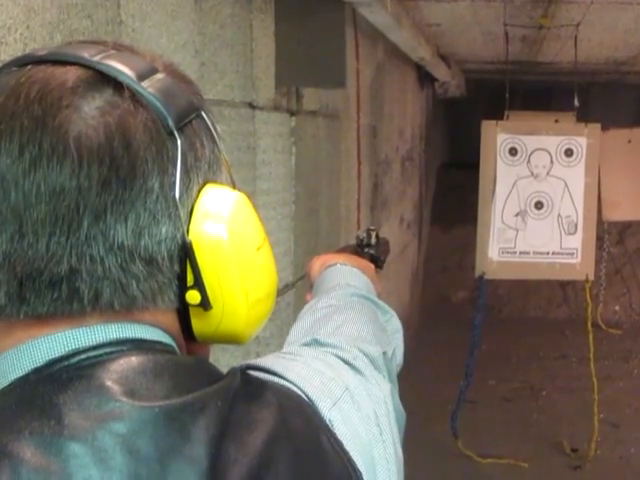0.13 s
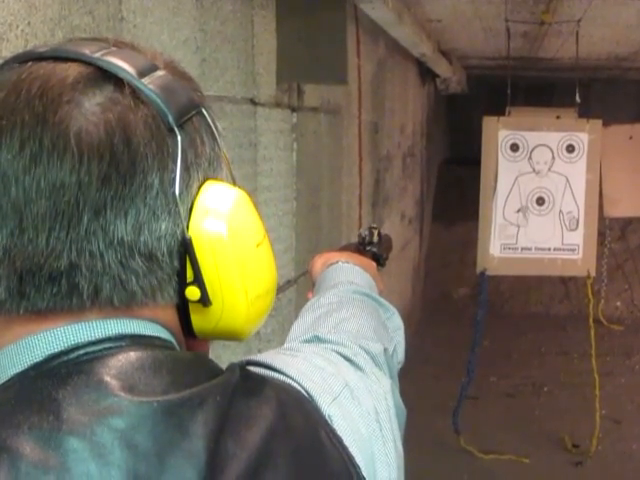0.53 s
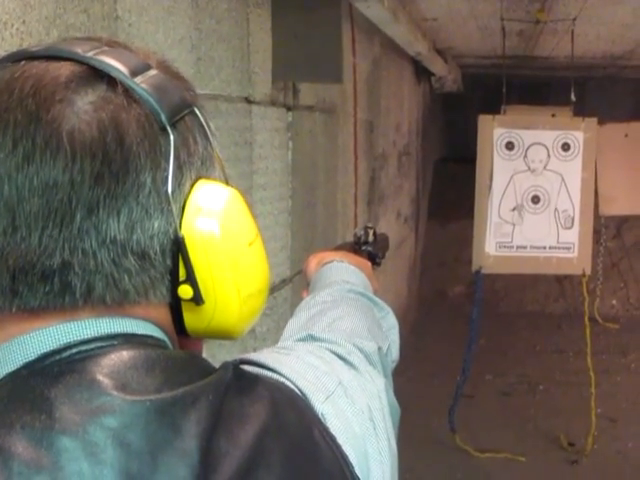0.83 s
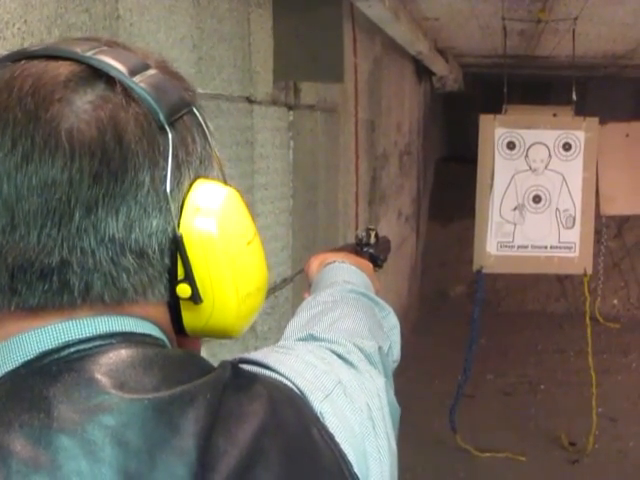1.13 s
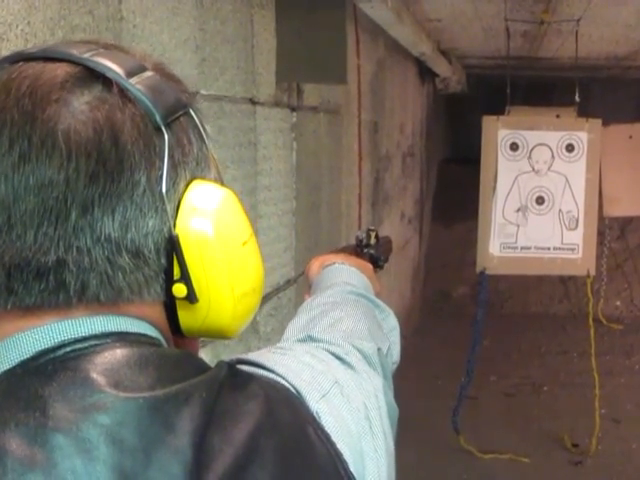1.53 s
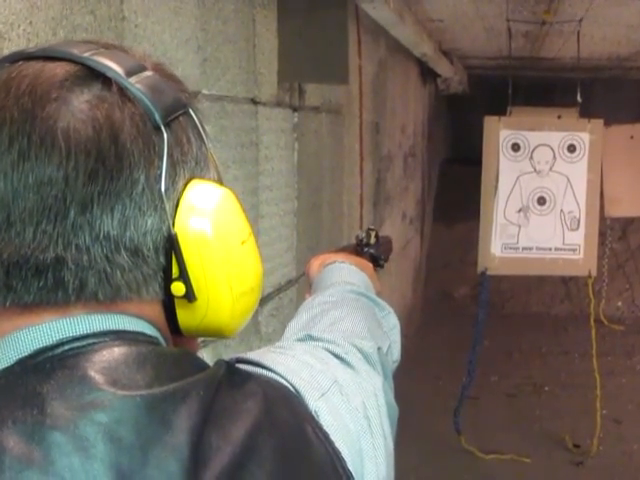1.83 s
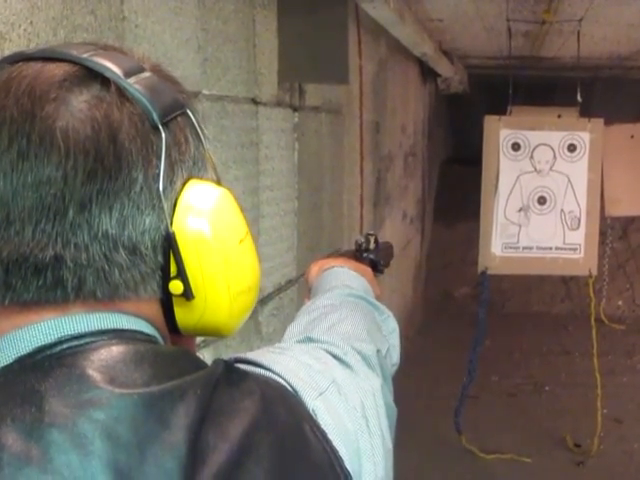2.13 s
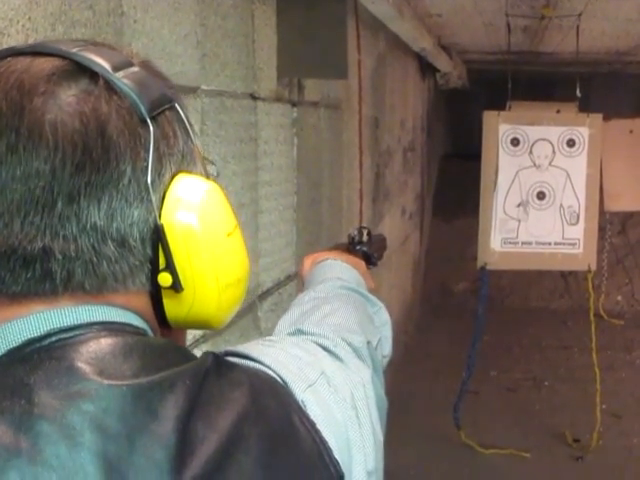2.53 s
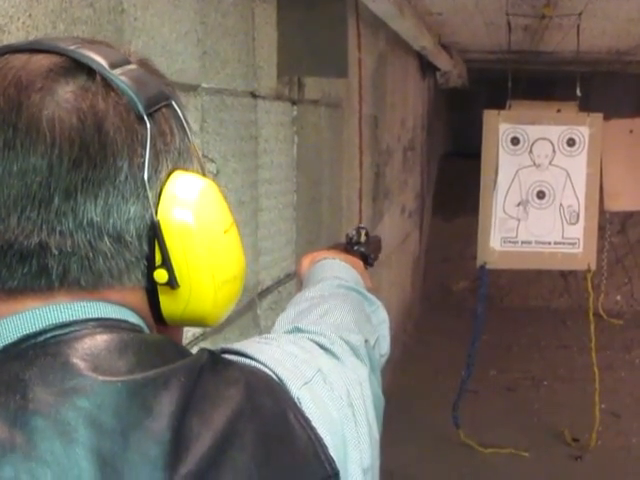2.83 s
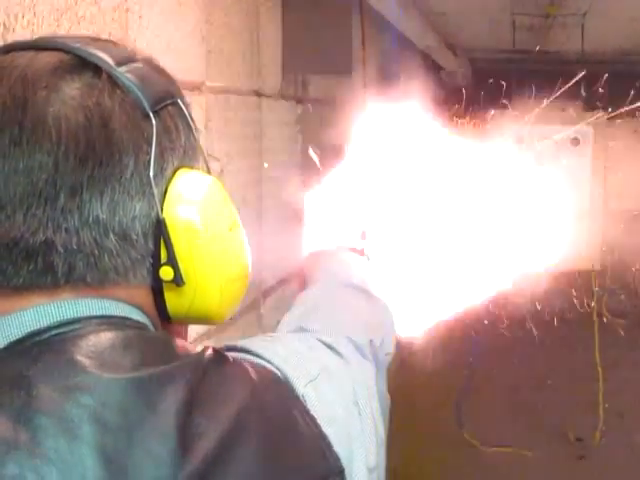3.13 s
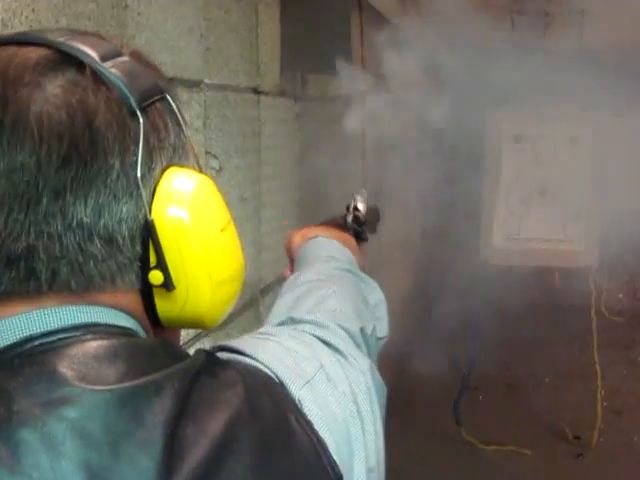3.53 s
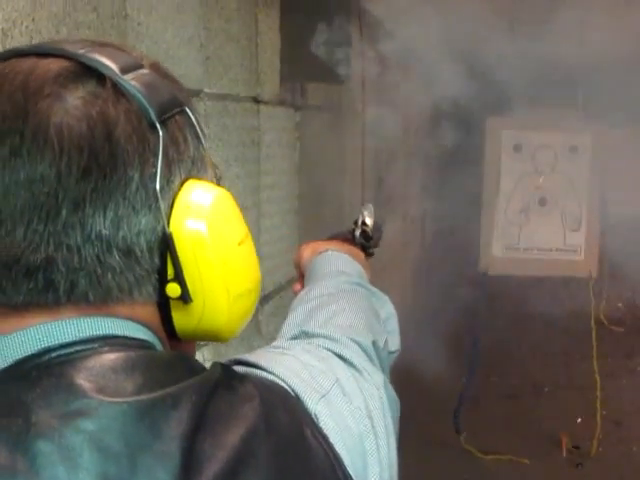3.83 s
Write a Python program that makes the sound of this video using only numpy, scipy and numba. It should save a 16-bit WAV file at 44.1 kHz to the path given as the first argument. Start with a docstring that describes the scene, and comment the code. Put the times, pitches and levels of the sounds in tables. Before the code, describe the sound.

Single flintlock pistol shot indoors: quick lock clack, loud blast, deep slowly fading boom

```python
"""Flintlock pistol in an indoor range

A flintlock fires in a concrete range, close to a camera, over steady ventilation. Flint strikes and scrapes
steel (rings and noise), priming fizzes and the vent spits (noise), then the charge goes off (shock pulse,
booth resonances, noise). Fading noise and wavering tones make the range's long low boom.
The gain control ducks under the blast and holds the boom almost level while its treble dies.
"""
import sys
import numpy as np
from scipy import signal
from scipy.fft import rfft, irfft, next_fast_len
from scipy.io import wavfile
from scipy.ndimage import map_coordinates
from numba import njit

SR = 44100
rng = np.random.default_rng(int(sys.argv[2]) if len(sys.argv) > 2 else 0)


def inscribe(sig):
    """Save sig as 16-bit PCM at rate SR to the path in sys.argv[1].

    A 1-D sig is mono; a 2-D sig holds one channel per row.
    Samples are clipped to [-1, 1] before scaling.
    """
    pcm = np.round(np.clip(np.atleast_2d(sig).T, -1, 1) * 32767)
    wavfile.write(sys.argv[1], SR, pcm.astype(np.int16))


N = 176400
T = np.arange(N) / SR
SHOT_S = 3.1992
STRIKE_S = 3.046


def amp(db):
    """Decibels to gain."""
    return 10 ** (np.asarray(db) / 20)


def unit(x):
    """Scale to rms 1."""
    return x / np.sqrt(np.mean(x ** 2) + 1e-20)


def along(points, hz):
    """Interpolate (Hz, value) points on a log frequency axis."""
    point_hz, value = np.transpose(points)
    return np.interp(np.log(hz + 1), np.log(point_hz + 1), value)


def filtered(x, response):
    """Multiply the spectrum of x by a gain function of Hz, with reflected edges."""
    edge = SR // 4
    size = next_fast_len(N + 2 * edge)
    padded = np.pad(x, (edge, size - N - edge), "reflect")
    spectrum = rfft(padded) * response(np.fft.rfftfreq(size, 1 / SR))
    return irfft(spectrum, size)[edge:edge + N]


def noise(spectrum):
    """Noise of rms 1 coloured by (Hz, dB) points."""
    return unit(filtered(rng.standard_normal(N), lambda hz: amp(along(spectrum, hz))))


def band(centre_hz, half_width_hz):
    """Noise of rms 1 in one resonance, at half amplitude half_width_hz off centre."""
    return unit(filtered(rng.standard_normal(N), lambda hz: 1 / (1 + ((hz - centre_hz) / half_width_hz) ** 2)))


def wobble(knots_per_s):
    """Smooth random curve through unit-variance knots."""
    return map_coordinates(rng.standard_normal(256), [T * knots_per_s], mode="wrap")


def envelope(start_s, rise_s, hold_s, t60_s):
    """Straight rise, hold, exponential fall."""
    t = T - start_s
    fall_db = -60 * np.maximum(t - rise_s - hold_s, 0) / t60_s
    return np.clip(t / rise_s, 0, 1) * amp(fall_db)


# Resonances of the shooting booth. Each row: frequency in Hz, level in dB, T60 in seconds.
BOOTH_MODES = [(82.3, 2.5, .3), (200, 6, 0.16), (260, 7, .15), (329.6, 6, 0.12), (519.4, 10, 0.091),
               (780, 19, .02), (870, 10, 0.077), (1046, 7, .07), (1452, 2.5, 0.11), (1819, 1, 0.12),
               (1944, -1, .1), (2483, 3, .09)]
# Blast noise spectrum. Each row: frequency in Hz, relative level in dB.
BLAST_SPECTRUM = [(29, -34), (60, -3), (200, -3.5), (400, 2.5), (600, -0.5), (900, 0), (1250, -6),
                  (1900, -3.5), (2600, -7.5), (5000, -17), (7000, -24), (11000, -19), (14000, -60)]
SHOCK_S, SHOCK_DB = 0.00046, 6
BLAST_DB, BLAST_RISE_S, BLAST_T60_S = 10, .003, 0.099
RING_HZ, RING_DB, RING_RISE_S, RING_T60_S = 3670, -27.5, .002, 1.3


def blast():
    """The muzzle's shock wave rings the booth, scatters from its walls and leaves a thin ring of steel."""
    t = np.maximum(T - SHOT_S, 0)
    shock = (T >= SHOT_S) * (1 - t / SHOCK_S) * np.exp(-t / SHOCK_S)
    booth = np.zeros(N)
    for k, (hz, db, t60_s) in enumerate(BOOTH_MODES):
        polarity = (-1) ** k
        booth += polarity * amp(db - 60 * t / t60_s) * np.sin(2 * np.pi * hz * t)
    scatter = noise(BLAST_SPECTRUM) * envelope(SHOT_S, BLAST_RISE_S, 0, BLAST_T60_S)
    ring = np.sin(2 * np.pi * RING_HZ * t) * envelope(SHOT_S, RING_RISE_S, 0, RING_T60_S)
    return amp(SHOCK_DB) * shock + booth + amp(BLAST_DB) * scatter + amp(RING_DB) * ring


# Reverberation spectrum before its fade. Each row: frequency in Hz, relative level in dB.
BOOM_SPECTRUM = [(12, -33), (20, -13), (85, -0.5), (165, -11.5), (210, -10.5), (395, -15), (439, -15),
                 (514, -18.5), (969, -22.5), (1200, -30.5), (1480, -25), (4140, -39.5), (5390, -44),
                 (6320, -58.5), (11000, -54), (14300, -91.5), (22000, -120)]
# Reverberation time of the range. Each row: frequency in Hz, T60 in seconds.
BOOM_T60_S = [(60, 9.9), (200, 2.8), (500, 1.94), (1200, 1.81), (2500, 1.61), (5000, 1.07), (9000, .7)]
BOOM_DB, BOOM_RISE_S, BOOM_ROUGH_DB = -3, 0.09, 0.53


def reverberation():
    """Dense reflections fill the range; each frequency then fades at its own rate."""
    hz, t, bins = signal.stft(noise(BOOM_SPECTRUM), SR, nperseg=1024)
    fade = amp(-60 * np.maximum(t - SHOT_S - BOOM_RISE_S, 0) / along(BOOM_T60_S, hz)[:, None])
    wash = signal.istft(bins * fade, SR, nperseg=1024)[1][:N]
    rise = np.sqrt(np.clip((T - SHOT_S) / BOOM_RISE_S, 0, 1))
    return amp(BOOM_DB + BOOM_ROUGH_DB * wobble(45)) * wash * rise


# Standing waves of the range. Each row: frequency in Hz, level in dB.
ROOM_MODES = [(30.5, -5.5), (56, -5), (73.9, -1.5), (83, -7), (118, -15.5), (152.8, -11), (224, -15),
              (336, -21.5), (435.5, -25)]
MODE_RISE_S, MODE_T60_S, MODE_DRIFT_RAD, MODE_ROUGH_DB = 0.19, 4.45, 0.72, 1.35


def standing_waves():
    """Low room modes build up and decay, each wavering in level and phase."""
    waves = np.zeros(N)
    for hz, db in ROOM_MODES:
        phase = 2 * np.pi * (hz * T + rng.random()) + MODE_DRIFT_RAD * wobble(8)
        waves += amp(db + MODE_ROUGH_DB * wobble(14)) * np.sin(phase)
    return waves * envelope(SHOT_S, MODE_RISE_S, 0, MODE_T60_S)


# Dull first return. Each row: frequency in Hz, relative level in dB.
THUD_SPECTRUM = [(30, -16), (60, 1), (120, 2), (200, -21), (500, -12), (1200, -27), (4000, -48.5),
                 (11000, -70)]
THUD_S, THUD_DB, THUD_RISE_S, THUD_T60_S = 3.286, -4.5, 0.014, .25
# Echo from the far end. Each row: frequency in Hz, relative level in dB.
ECHO_SPECTRUM = [(200, -9), (700, -3.5), (1800, 1), (4000, -15), (9000, -44)]
ECHO_S, ECHO_DB, ECHO_RISE_S, ECHO_HOLD_S, ECHO_T60_S = 3.365, -9, 0.032, 0.014, .12


def returns():
    """A dull thud returns from the range, then a brighter echo from the far end."""
    thud = amp(THUD_DB) * noise(THUD_SPECTRUM) * envelope(THUD_S, THUD_RISE_S, 0, THUD_T60_S)
    echo = amp(ECHO_DB) * noise(ECHO_SPECTRUM) * envelope(ECHO_S, ECHO_RISE_S, ECHO_HOLD_S, ECHO_T60_S)
    return thud + echo


# Priming powder fizz. Each row: frequency in Hz, relative level in dB.
FIZZ_SPECTRUM = [(290, -40.5), (500, -4), (895, -15.5), (1430, -4), (5260, -9), (6310, -27.5),
                 (7090, -15.5), (11000, -14.5), (14300, -44), (22000, -120)]
FIZZ_DB, FIZZ_RISE_S, FIZZ_T60_S = -40, .02, 1
# Vent jet. Each row: frequency in Hz, relative level in dB.
VENT_SPECTRUM = [(150, -32), (300, -5.5), (1200, -1.5), (2000, -5), (2700, 4.5), (3300, -11), (4000, -0.5),
                 (5400, -3), (7000, -17.5), (10500, 0), (14000, -54)]
VENT_PEAK_S, VENT_DB, VENT_SWELL_T60_S, VENT_FALL_T60_S = 3.195, -9, .022, 0.17


def priming():
    """Powder fizzes in the pan, then a jet swells out of the vent and dies exponentially."""
    fizz = amp(FIZZ_DB) * noise(FIZZ_SPECTRUM) * envelope(STRIKE_S, FIZZ_RISE_S, 0, FIZZ_T60_S)
    t = T - VENT_PEAK_S
    drop_db = 60 * np.maximum(t / VENT_FALL_T60_S, -t / VENT_SWELL_T60_S)
    jet = amp(VENT_DB - drop_db) * noise(VENT_SPECTRUM)
    return fizz + jet


# Blows in the lock. Each row: start in seconds, level in dB, noise centre in Hz.
BLOWS = [(3.0463, -17, 3800), (3.053, -19.5, 2720), (3.0555, -25, 1700), (3.069, -31.5, 1770)]
BLOW_RISE_S, BLOW_T60_S, BLOW_HALF_WIDTH_HZ = .0005, 0.03, 560
# Steel resonances. Each row: frequency in Hz, relative level in dB, T60 in seconds.
STEEL_MODES = [(1653, -4, .14), (2640, -17.5, .2), (3480, -7, .2), (5660, -6, .06), (8210, -9, .23),
               (10240, -6, .19)]
STEEL_RE_BLOW_DB, STEEL_RISE_S = -18.5, 0.0007
# Flint scrape. Each row: frequency in Hz, relative level in dB.
SCRAPE_SPECTRUM = [(180, -70), (300, -47), (591, -17), (1270, -23), (1650, -5), (2470, -21), (2750, -12.5),
                   (5180, -11.5), (6490, -22.5), (11000, -14.5), (14300, -55), (22000, -120)]
SCRAPE_DB, SCRAPE_RISE_S, SCRAPE_HOLD_S, SCRAPE_T60_S = -24.5, 0.0076, 0.0051, 0.11


def lock():
    """The cock's blows ring the steel while the flint scrapes down it."""
    scrape_envelope = envelope(STRIKE_S, SCRAPE_RISE_S, SCRAPE_HOLD_S, SCRAPE_T60_S)
    out = amp(SCRAPE_DB) * noise(SCRAPE_SPECTRUM) * scrape_envelope
    for start_s, blow_db, centre_hz in BLOWS:
        ring = np.zeros(N)
        for hz, db, t60_s in STEEL_MODES:
            tone = np.sin(2 * np.pi * (hz * T + rng.random()))
            ring += amp(db) * envelope(start_s, STEEL_RISE_S, 0, t60_s) * tone
        knock = band(centre_hz, BLOW_HALF_WIDTH_HZ) * envelope(start_s, BLOW_RISE_S, 0, BLOW_T60_S)
        out += amp(blow_db) * (knock + amp(STEEL_RE_BLOW_DB) * ring)
    return out


# Rushing air. Each row: frequency in Hz, relative level in dB.
AIR_SPECTRUM = [(12, -38.5), (20, -5), (79, -9), (111, -4), (127, -13), (141, -14), (246, -14),
                (375, -15.5), (514, -16.5), (1400, -19.5), (4850, -29.5), (5540, -37), (6320, -49.5),
                (7600, -35), (11000, -38.5), (14300, -82.5), (22000, -120)]
AIR_DB = -47
FAN_HZ, FAN_HALF_WIDTH_HZ, FAN_DB = 110, 13, -50.5
WHINE_HZ, WHINE_DB, WHINE_DRIFT_RAD = 7870, -67, .3
BUZZ_HZ, BUZZ_DEPTH = 30.2, .3


def background():
    """Rushing air, the fan's wavering hum and a thin, buzzing whine from the camera."""
    air = amp(AIR_DB) * noise(AIR_SPECTRUM)
    fan = amp(FAN_DB) * band(FAN_HZ, FAN_HALF_WIDTH_HZ)
    buzz = 1 + BUZZ_DEPTH * np.sin(2 * np.pi * BUZZ_HZ * T)
    whine = np.sin(2 * np.pi * WHINE_HZ * T + WHINE_DRIFT_RAD * wobble(12)) * buzz
    return air + fan + amp(WHINE_DB) * whine


def scene():
    """Everything at the microphone."""
    boom = reverberation() + standing_waves() + returns()
    return (blast() + boom + priming() + lock() + background())[None]


@njit
def reduction(excess_db, grab, release_db):
    """Gain reduction in dB: it chases each peak over the limit and lets go at a steady rate."""
    out, held = np.zeros(len(excess_db)), 0.0
    for i in range(len(excess_db)):
        if excess_db[i] > held:
            held += grab * (excess_db[i] - held)
        else:
            held = max(held - release_db, 0.0)
        out[i] = held
    return out


LIMIT_DB, GRAB_S, RELEASE_DB_PER_S = -10.5, 0.0016, 124
STEP_SAMPLES, STEPPED_SHARE = 20, .4
CLIP_LEVEL = .95
NOTCH_HZ, NOTCH_WIDTH_HZ, NOTCH_DB = 6330, 234, -24
TOP_HZ, TOP_SLOPE_HZ = 11250, 200


def record(dry):
    """The camera: gain control moving partly in small steps, clipping, a narrow treble notch, a band limit."""
    x = dry[0]
    excess_db = 20 * np.log10(np.abs(x) + 1e-9) - LIMIT_DB
    cut_db = reduction(excess_db, 1 / (GRAB_S * SR), RELEASE_DB_PER_S / SR)
    stepped_db = np.repeat(cut_db[::STEP_SAMPLES], STEP_SAMPLES)[:N]
    x = x * amp(-cut_db - STEPPED_SHARE * (stepped_db - cut_db))
    x = np.clip(x, -CLIP_LEVEL, CLIP_LEVEL)
    x = filtered(x, lambda hz: amp(NOTCH_DB * np.exp(-((hz - NOTCH_HZ) / NOTCH_WIDTH_HZ) ** 2)))
    return filtered(x, lambda hz: np.clip((TOP_HZ - hz) / TOP_SLOPE_HZ + .5, 0, 1))[None]


dry = scene()
out = record(dry)
inscribe(out)
```